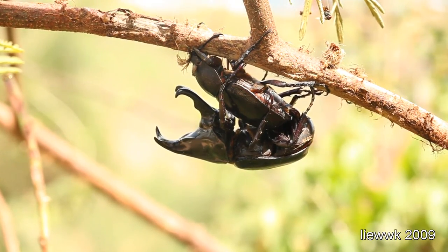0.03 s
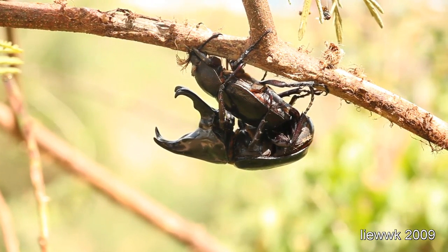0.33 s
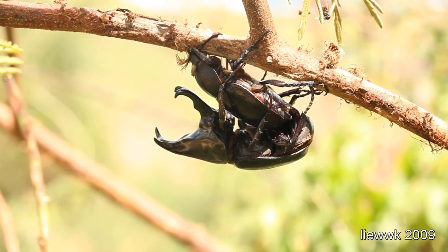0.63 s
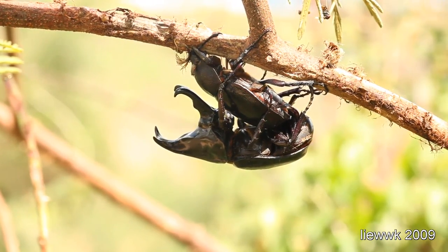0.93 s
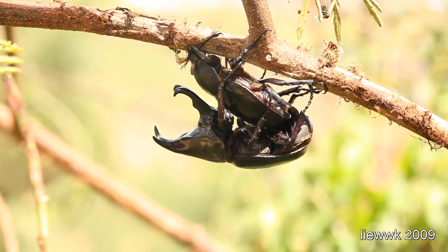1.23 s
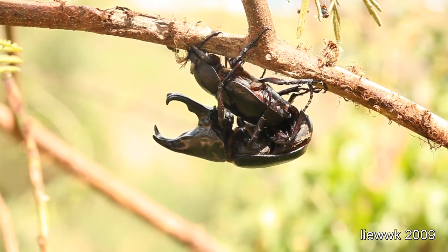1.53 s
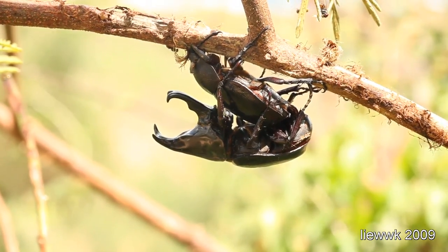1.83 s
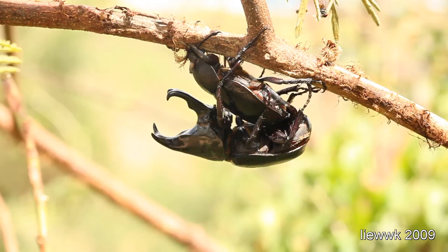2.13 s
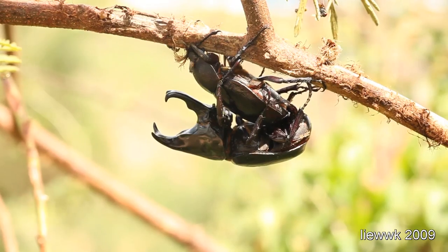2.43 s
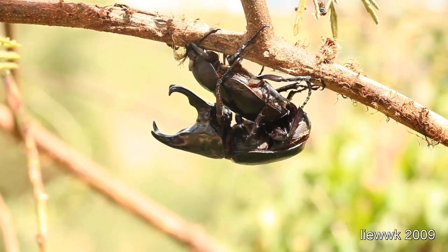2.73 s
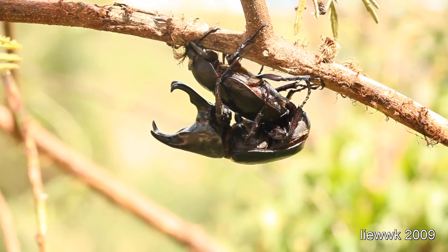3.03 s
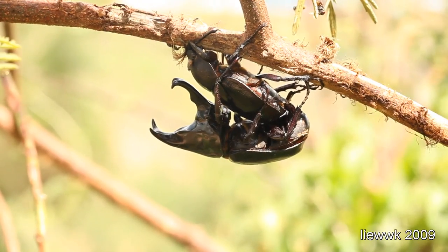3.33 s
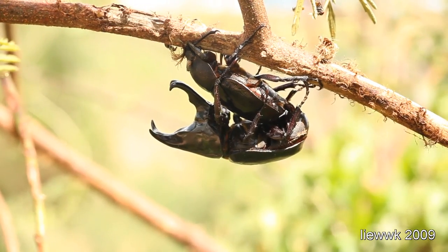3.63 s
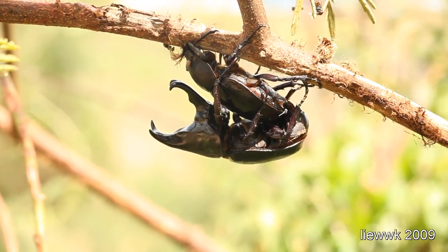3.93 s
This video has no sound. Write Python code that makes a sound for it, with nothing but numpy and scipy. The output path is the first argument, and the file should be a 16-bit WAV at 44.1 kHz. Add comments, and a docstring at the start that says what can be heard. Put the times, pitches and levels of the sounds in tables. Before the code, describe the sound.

A bird whistles five quick, rising notes with a slight echo, outdoors over distant traffic and a steady hiss. Smaller birds chirp faintly farther off, and two soft knocks sound near the microphone toward the end.

```python
"""A wash of distant traffic is heard first, with a low engine hum and a steady high hiss.
Over it a bird whistles five scooped notes, each a gliding near-sine tone longer than the last;
branches scatter them and a far surface returns them. Smaller birds chirp and twitter faintly.
Late on, a thin insect-like tone sets in, and two soft knocks ring close by in damped modes."""
import sys
import numpy as np
from scipy import signal
from scipy.fft import rfft, irfft, next_fast_len
from scipy.io import wavfile
from scipy.ndimage import uniform_filter1d, map_coordinates

SR = 44100
rng = np.random.default_rng(int(sys.argv[2]) if len(sys.argv) > 2 else 0)


def transcribe(u):
    """Save the signal u as a 16-bit wav file named by the first command-line argument.

    u: samples, shape (n,) or (channels, n), limited to [-1, 1]; the rate is SR.
    q: integer samples, one column per channel.
    """
    v = np.clip(np.atleast_2d(u).T, -1, 1)
    q = np.round(v * 32767).astype(np.int16)
    wavfile.write(sys.argv[1], SR, q)


N = 176400


def amp(db):
    """Amplitude ratio of a level: tenfold for every 20 dB."""
    return 10 ** (np.asarray(db) / 20)


def unit(x):
    """Normalisation to rms 1."""
    return x / np.sqrt(np.mean(x ** 2) + 1e-20)


def clock():
    """The time of every sample, in seconds."""
    return np.arange(N) / SR


def curve(rows):
    """Linear interpolation between (seconds, value) points."""
    return np.interp(clock(), *np.transpose(rows))


def bell(x, centre, width):
    """A Gaussian of height 1 whose width is its standard deviation."""
    return np.exp(-.5 * ((x - centre) / width) ** 2)


def wobble(rate):
    """Random modulation: a spline through `rate` random knots a second."""
    return map_coordinates(rng.standard_normal(2048), [clock() * rate], mode="mirror")


def filtered(x, response):
    """Linear filtering: the spectrum of x is multiplied by a frequency response."""
    size = next_fast_len(N + SR // 2)
    return irfft(rfft(x, size) * response(np.fft.rfftfreq(size, 1 / SR)), size)[:N]


def rush(spectrum, patchy_db):
    """Coloured noise of rms 1, its gain modulated in random patches of time and frequency."""
    cells = signal.stft(rng.standard_normal(N), nperseg=512)[2]
    patches = uniform_filter1d(rng.standard_normal(cells.shape), size=5, axis=0)
    patches = uniform_filter1d(patches, size=16, axis=1)
    noise = signal.istft(cells * amp(patchy_db * unit(patches)), nperseg=512)[1][:N]
    points_hz, db = np.transpose(spectrum)
    return unit(filtered(noise, lambda hz: amp(np.interp(np.log(hz + 1), np.log(points_hz), db))))


def band(centre_hz, width_hz):
    """Narrow-band noise of rms 1: white noise through a Gaussian passband."""
    return unit(filtered(rng.standard_normal(N), lambda hz: bell(hz, centre_hz, width_hz)))


def tone(hz):
    """A sine of rms 1 whose phase is the integral of its frequency."""
    return np.sqrt(2) * np.sin(2 * np.pi * np.cumsum(hz) / SR)


def add(track, start_s, sound):
    """Superposition: a sound is summed into a track from its start time."""
    part = track[max(round(start_s * SR), 0):][:len(sound)]
    part += sound[:len(part)]


def traffic():
    """Incoherent sources merge into a low roar and a tyre wash; single vehicles swell past."""
    # Each row: time in seconds, level in dB.
    roar_levels = [(0, -34), (.5, -34), (1.02, -34.5), (1.53, -35.5), (2.37, -35), (2.92, -39),
                   (3.25, -37.5), (3.5, -35.5), (4, -37)]
    tyre_levels = [(0, -32), (1, -31.5), (1.55, -32), (2.3, -32.5), (3, -32.5), (3.5, -32.5), (4, -34.5)]
    # Each row: frequency in Hz, relative spectral density in dB.
    roar_spectrum = [(15, -50), (28, -37), (40, -34), (60, -8.5), (110, -3.5), (160, 0.5), (260, 0),
                     (380, -2), (520, -1), (680, -5), (900, -8.5), (1500, -18), (4000, -68)]
    tyre_spectrum = [(300, -38), (650, -9), (850, -2), (1020, -0.5), (1250, -2.5), (1600, -6), (2100, -11),
                     (3000, -13), (4500, -25), (8000, -52)]
    # Each row: centre and width in seconds, level in dB, centre and width of the tyre band in Hz.
    passes = [(.3, 0.15, -36.5, 1000, 200), (0.887, 0.21, -33.5, 850, 180), (1.74, 0.068, -38, 1120, 170),
              (2.6, .07, -37.5, 960, 171), (3.38, .25, -37.5, 1170, 190)]
    roar = amp(curve(roar_levels) + 0.19 * wobble(5.5)) * rush(roar_spectrum, patchy_db=1.0)
    tyres = amp(curve(tyre_levels) + 0.33 * wobble(6.77)) * rush(tyre_spectrum, patchy_db=0.68)
    vehicles = sum(amp(db) * bell(clock(), centre, width_s) * band(hz, width_hz)
                   for centre, width_s, db, hz, width_hz in passes)
    return roar + tyres + vehicles


def engine():
    """A distant engine hums at harmonics of its base rate; one of them comes and goes."""
    # Each row: harmonic number, level at full swell in dB, depth of the swell in dB.
    harmonics = [(3, -46, 1.5), (4, -43.5, 17), (6, -49.5, 3)]
    # Each row: time in seconds, swell from 0 (faint) to 1 (full).
    swell_points = [(0, .2), (.45, .9), (1, 0.53), (1.55, 1), (2.1, 0.066), (2.4, 1), (2.75, 0.9),
                    (3.2, 0.51), (3.65, 0.96), (4, 0.44)]
    base_hz = 25.09 * (1 + 0.0064 * wobble(4.26))
    swell, waver_db = curve(swell_points), 1.2
    return sum(amp(db + depth_db * (swell - 1) + waver_db * wobble(2.85)) * tone(order * base_hz)
               for order, db, depth_db in harmonics)


def hiss():
    """Broadband noise: a steady high hiss, and three dry rustles under Gaussian envelopes."""
    # Each row: frequency in Hz, relative spectral density in dB.
    hiss_spectrum = [(1200, -5), (2500, -5.5), (3500, -3.5), (4200, -3), (4900, -4), (5600, -1), (7100, 1),
                     (8300, -5), (9300, -11.5), (10500, -16.5), (11800, -24), (15500, -32.5)]
    rustle_spectrum = [(2000, -32), (3900, 4), (5200, -3), (6700, 6), (8000, -6), (10000, -24),
                       (15000, -45)]
    # Each row: centre in seconds, width in seconds, level in dB.
    rustles = [(.339, .009, -34.5), (3.218, 0.0037, -35.5), (3.45, 0.0065, -39)]
    bursts = sum(amp(db) * bell(clock(), centre, width) for centre, width, db in rustles)
    rustle = bursts * rush(rustle_spectrum, patchy_db=1.5)
    return amp(-37.5) * rush(hiss_spectrum, patchy_db=0.53) + rustle


def twitter():
    """The calls of many far birds overlap into a band of amplitude-modulated noise."""
    # Each row: time in seconds, level in dB.
    levels = [(0, -43), (.25, -44.5), (.47, -35.5), (.7, -44.5), (1.3, -50), (1.95, -47), (2.05, -43),
              (2.13, -49), (2.4, -45.5), (2.65, -63), (3.5, -47), (4, -45.5)]
    # Each row: frequency in Hz, relative spectral density in dB.
    spectrum = [(1200, -60), (2000, -11), (2700, 1.5), (3400, 2), (4100, -7), (5000, -7), (8000, -70)]
    flicker = amp(2.6 * wobble(45))
    return amp(curve(levels)) * unit(flicker * rush(spectrum, patchy_db=3.5))


def whistling_bird():
    """Frequency modulation of a near-pure tone: each note dips, then sweeps up to a crest."""
    # Each row: start and length in seconds, lowest pitch in Hz, level in dB, swell over the note in dB.
    notes = [(0.295, 0.12, 2313, -30.5, 17.5), (0.547, .147, 2287, -29, 5.5), (0.812, .159, 2273, -27.5, 2),
             (1.086, .167, 2253, -26.5, -1.5), (1.377, .17, 2238, -27, 2.5)]
    dip_at, crest_at = 0.349, 0.93  # fractions of the note
    attack_s, release_s = 0.017, 0.016
    waver_hz, flutter_db = 7 * wobble(120), 0.4 * wobble(69.4)
    out = np.zeros(N)
    for start, length, low_hz, db, swell_db in notes:
        t = np.arange(int(length * SR)) / SR
        progress, now = t / length, round(start * SR) + np.arange(len(t))
        fall_hz = 258 * np.interp(progress, [0, dip_at], [1, 0]) ** 2.49
        rise_hz = 613 * np.interp(progress, [dip_at, crest_at], [0, 1]) ** 2
        hook_hz = -90 * np.interp(progress, [crest_at, 1], [0, 1])
        hz = low_hz + fall_hz + rise_hz + hook_hz + waver_hz[now]
        sag_db = -3 * bell(progress, 0.54, 0.051)  # the note eases as it turns upward
        accent_db = 3.5 * bell(progress, 0.885, 0.036)  # a push just before the crest
        level_db = db + swell_db * (progress - .5) + sag_db + accent_db + flutter_db[now]
        gate = np.minimum(t / attack_s, 1) * np.minimum((length - t) / release_s, 1)
        add(out, start, gate * amp(level_db) * (tone(hz) + amp(-42) * tone(2 * hz)))
    return out


def scatter(x, t60_s):
    """Reverberation: many small reflections form a noise tail that decays exponentially."""
    t = np.arange(SR // 2) / SR
    tail = rng.standard_normal(len(t)) * np.exp(-np.log(1000) * t / t60_s)
    return signal.fftconvolve(x, tail / np.linalg.norm(tail))[:N]


def chirps():
    """Small, far birds peep in linear frequency sweeps under half-cosine envelopes."""
    # Each row: centre and length in seconds, pitch in Hz, glide over the chirp in Hz, level in dB.
    calls = [(.328, 0.021, 4250, -300, -38), (.338, .014, 3850, -300, -38), (0.44, 0.02, 3420, -250, -35),
             (.463, .02, 4100, -500, -39), (0.562, 0.02, 3510, 0, -31), (2.136, 0.017, 3760, -2, -41),
             (2.216, 0.021, 2786, -150, -35), (2.262, 0.019, 3400, -50, -34),
             (2.293, 0.019, 3800, -600, -39), (2.33, .022, 3250, -400, -38), (2.354, .028, 2760, -550, -35),
             (2.387, 0.018, 3630, -100, -37.5), (2.428, 0.023, 2830, -800, -36),
             (2.474, 0.028, 2830, 700, -38), (3.588, 0.024, 4370, 0, -39.5), (3.734, .028, 3860, -250, -41),
             (3.81, 0.027, 3350, -200, -40), (3.898, .018, 4340, 98, -39), (3.939, .024, 3230, -350, -37),
             (3.963, 0.019, 2800, -450, -38), (3.988, .02, 3980, 144, -42)]
    out = np.zeros(N)
    for centre, length, hz, glide_hz, db in calls:
        offset = np.linspace(-.5, .5, int(length * SR))
        add(out, centre - length / 2, amp(db) * np.cos(np.pi * offset) * tone(hz + glide_hz * offset))
    return out


def echo(x):
    """Reflection from a far surface: one delayed, blurred return that grows through the phrase."""
    # Each row: frequency in Hz, relative gain of the reflection in dB.
    colour = [(2250, -10), (2450, -3.5), (2650, 0), (2900, -8)]
    delay_s, growth_db_per_s = 0.089, 3
    reflection = np.zeros(N)
    add(reflection, delay_s, x + 0.35 * scatter(x, t60_s=0.022))
    gain = amp(-11.5 + growth_db_per_s * clock())
    return filtered(gain * reflection, lambda hz: amp(np.interp(hz, *np.transpose(colour))))


def insect():
    """Noise in a very narrow band is heard as a pitch: a thin, insect-like tone that slowly fades."""
    start_s, attack_s, fade_db_per_s = 3.11, 0.03, 4
    age = np.maximum(clock() - start_s, 0)
    envelope = np.minimum(age / attack_s, 1) * amp(-52 - fade_db_per_s * age)
    return envelope * band(centre_hz=8300, width_hz=70)


def knocks():
    """Modal vibration: each soft, hollow bump excites three quickly damped resonances."""
    # Each row: start in seconds, gain in dB.
    strikes = [(3.3123, -15), (3.4099, -15)]
    # Each row: frequency in Hz, relative level in dB, time to decay by 60 dB in seconds.
    modes = [(183, -16, 0.11), (362, -2.5, .035), (456, -1.5, 0.04)]
    out, t = np.zeros(N), np.arange(SR // 10) / SR
    ring = sum(amp(db) * np.exp(-np.log(1000) * t / t60) * np.sin(2 * np.pi * hz * t)
               for hz, db, t60 in modes)
    soft_onset = 1 - np.exp(-t / 0.0017)
    for start, db in strikes:
        add(out, start, amp(db) * ring * soft_onset)
    return out


def scene():
    """Superposition of the birds, their reflections among the trees and the sounds around them."""
    song, peeps = whistling_bird(), chirps()
    branches = scatter(amp(-17) * song, t60_s=0.047)  # close reflections roughen the glides
    grove = scatter(amp(-8.5) * song + amp(-4.5) * peeps, t60_s=0.61)
    birds = song + branches + echo(song) + peeps + grove + twitter()
    return (birds + insect() + traffic() + engine() + knocks() + hiss())[None]


def record(dry):
    """Band limiting: an ideal low-pass filter removes everything above 15.7 kHz."""
    return filtered(dry[0], lambda hz: hz < 15700)[None]


dry = scene()
out = record(dry)
transcribe(out)
```